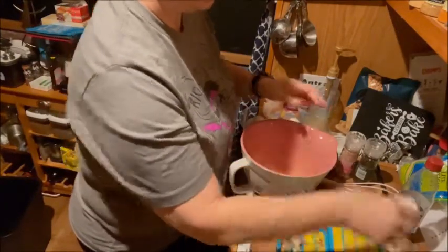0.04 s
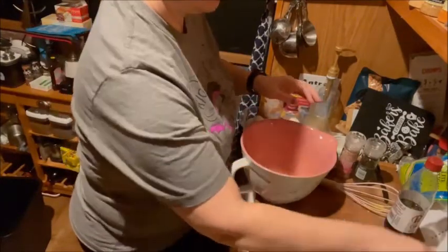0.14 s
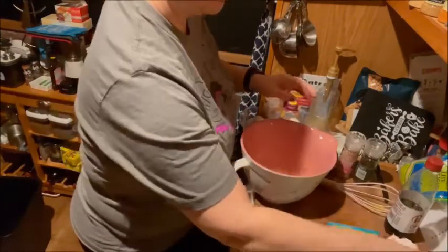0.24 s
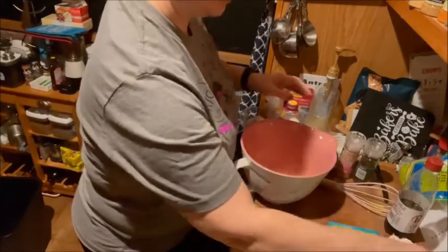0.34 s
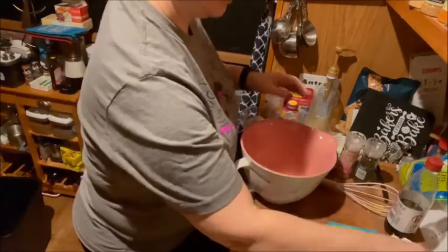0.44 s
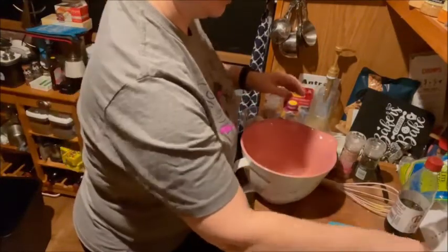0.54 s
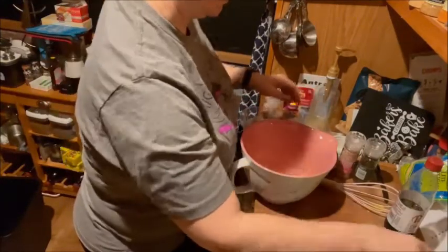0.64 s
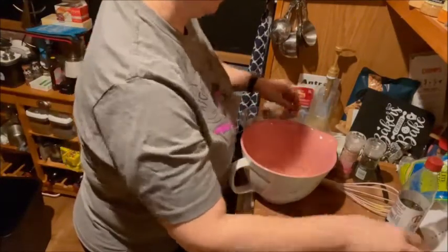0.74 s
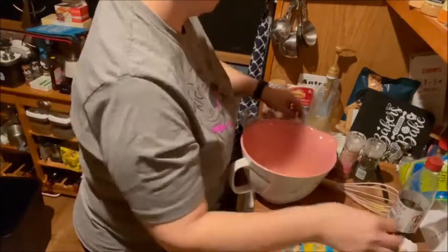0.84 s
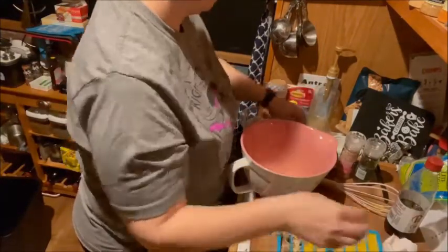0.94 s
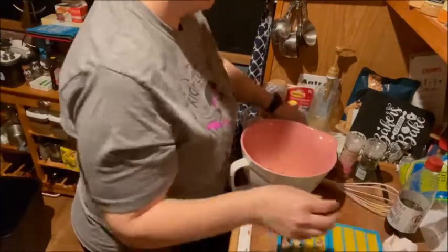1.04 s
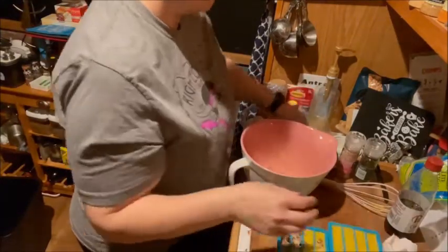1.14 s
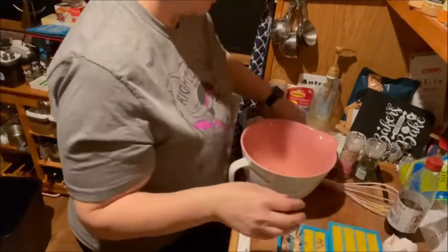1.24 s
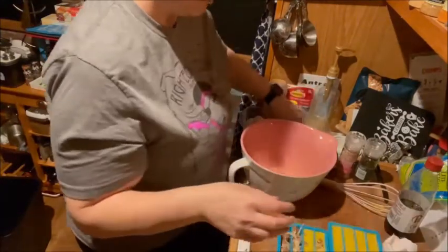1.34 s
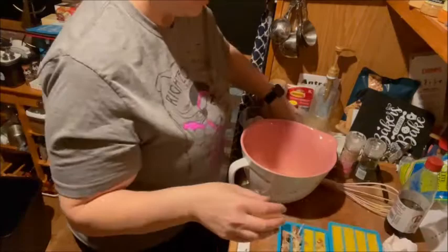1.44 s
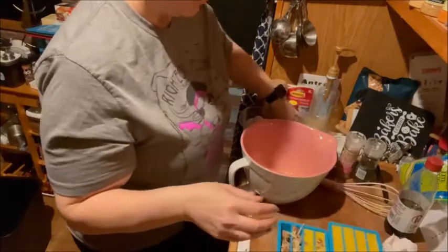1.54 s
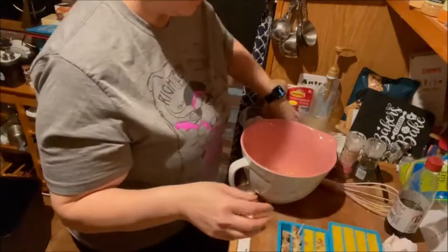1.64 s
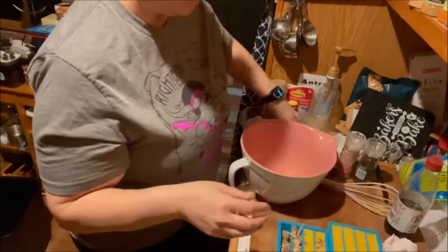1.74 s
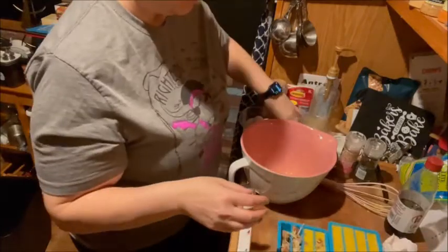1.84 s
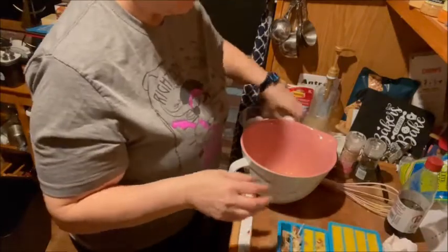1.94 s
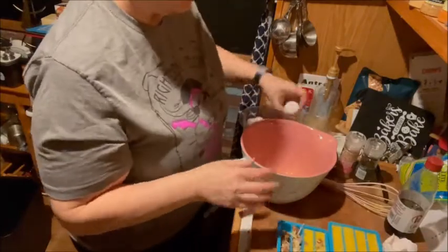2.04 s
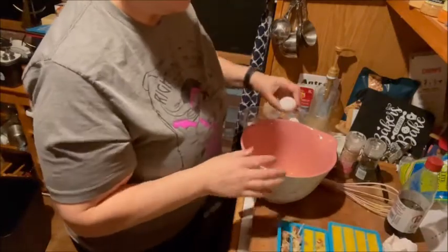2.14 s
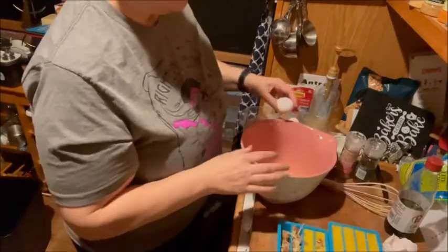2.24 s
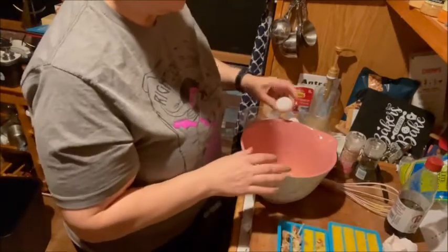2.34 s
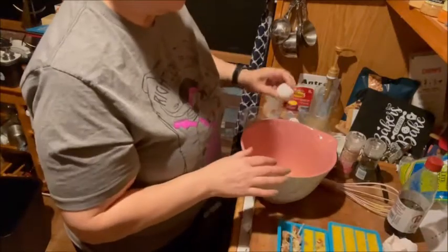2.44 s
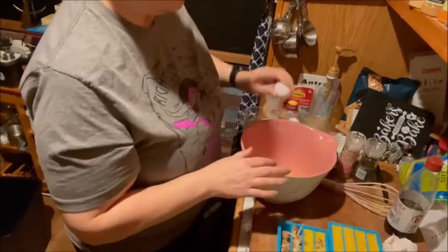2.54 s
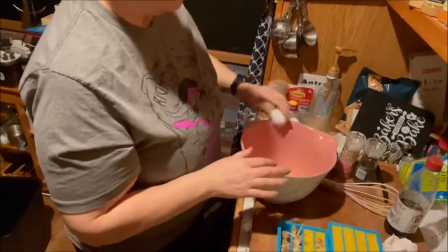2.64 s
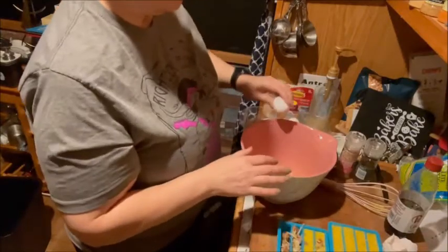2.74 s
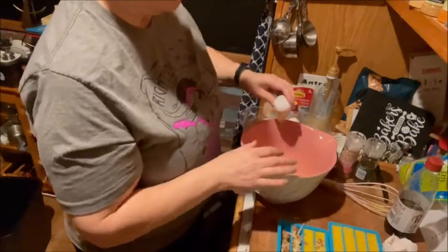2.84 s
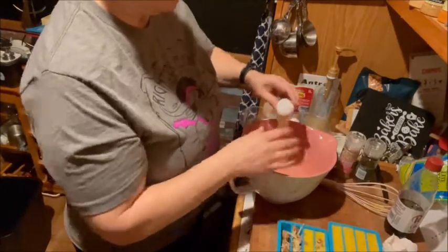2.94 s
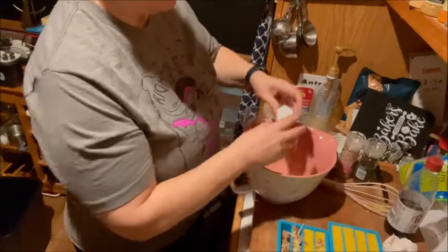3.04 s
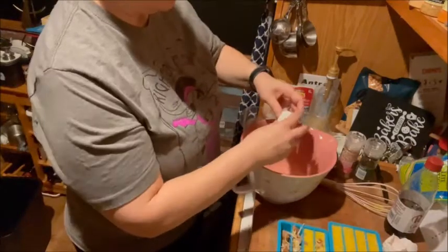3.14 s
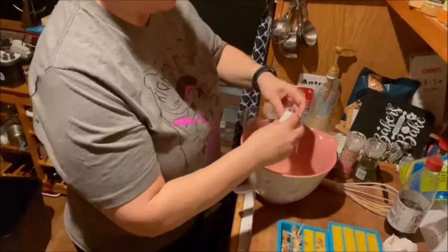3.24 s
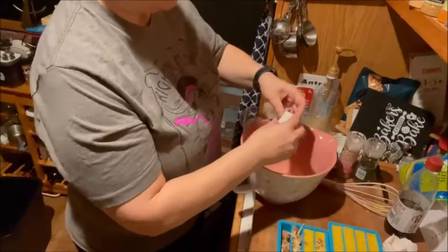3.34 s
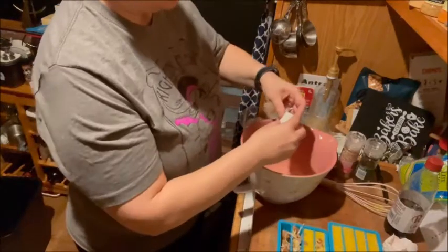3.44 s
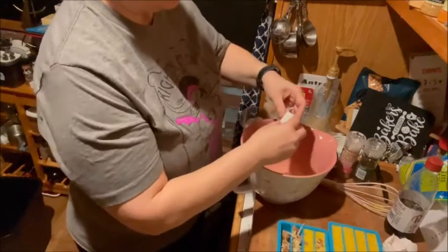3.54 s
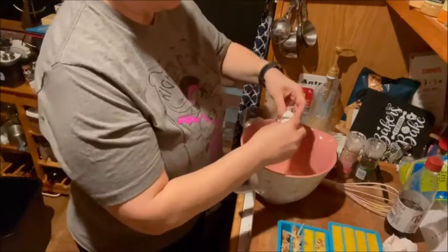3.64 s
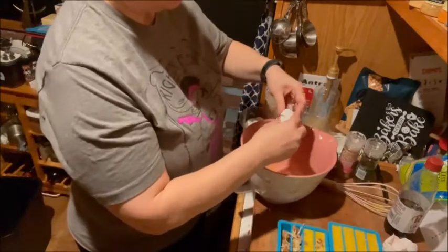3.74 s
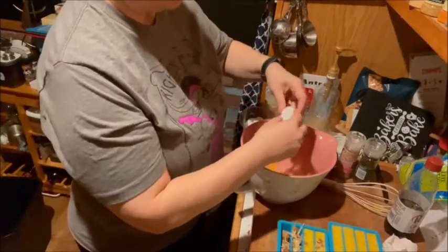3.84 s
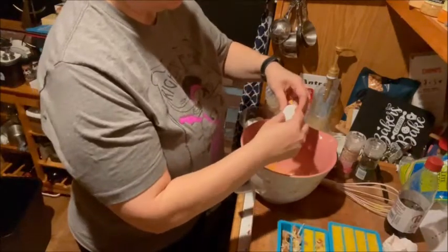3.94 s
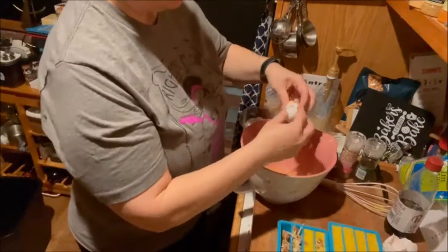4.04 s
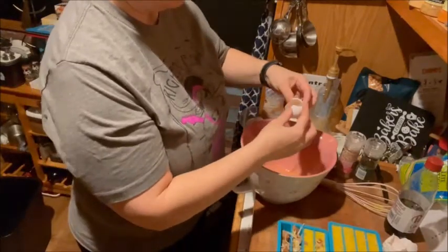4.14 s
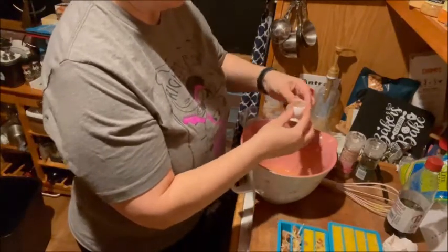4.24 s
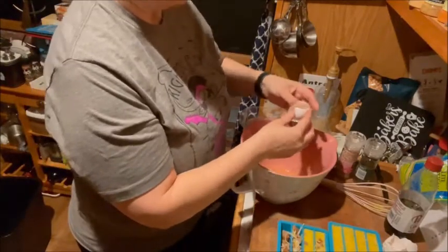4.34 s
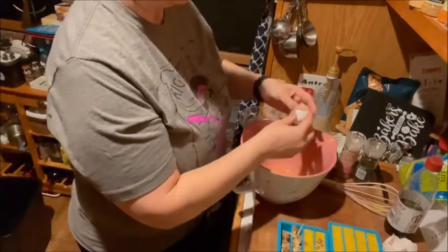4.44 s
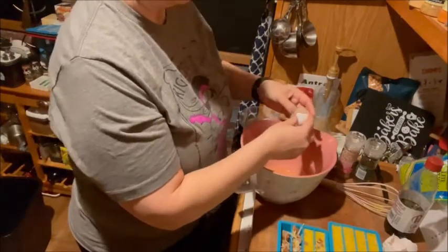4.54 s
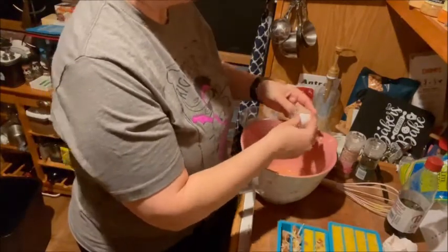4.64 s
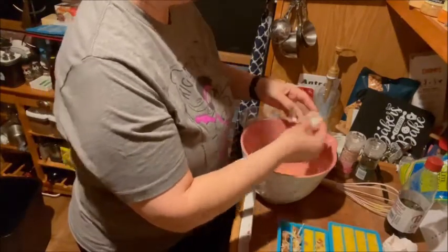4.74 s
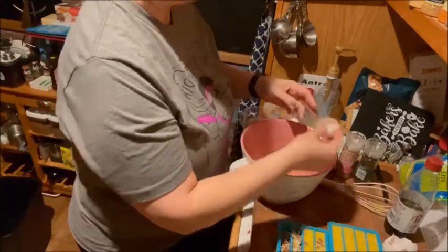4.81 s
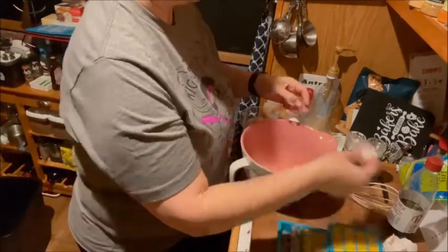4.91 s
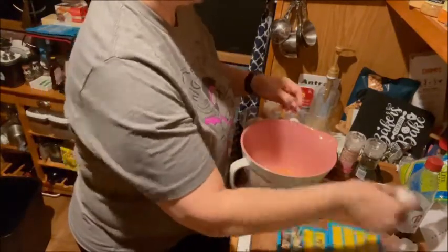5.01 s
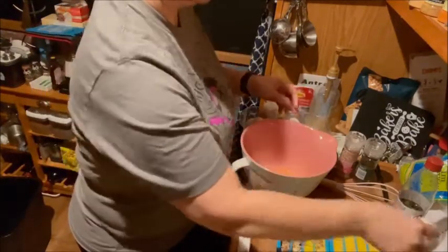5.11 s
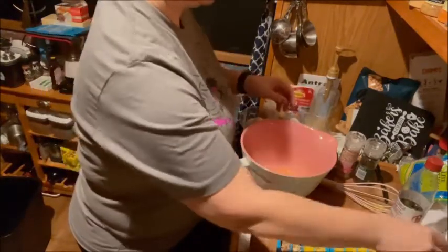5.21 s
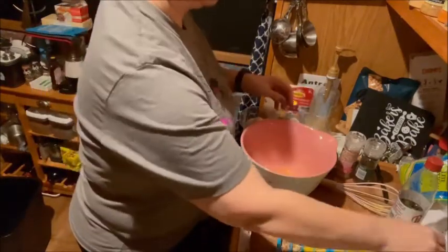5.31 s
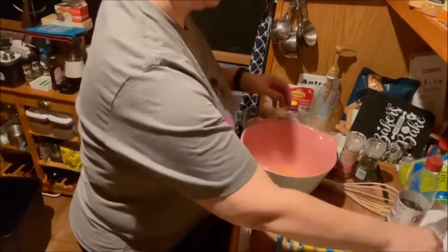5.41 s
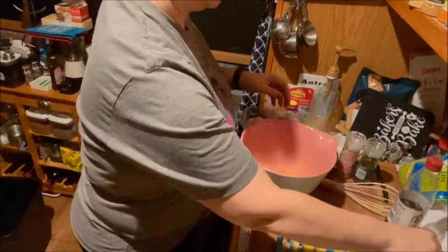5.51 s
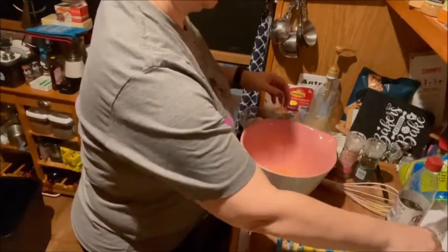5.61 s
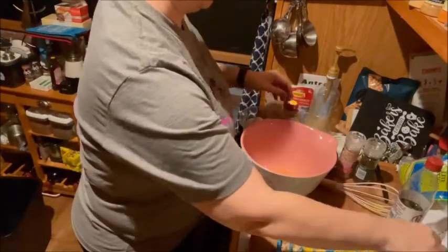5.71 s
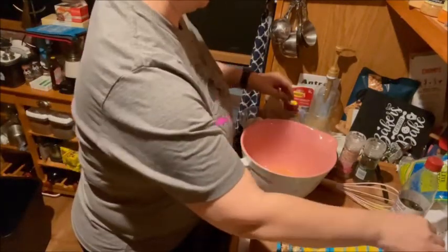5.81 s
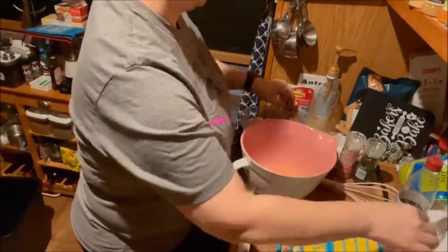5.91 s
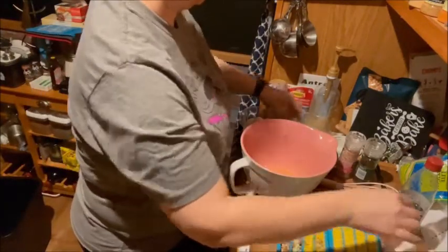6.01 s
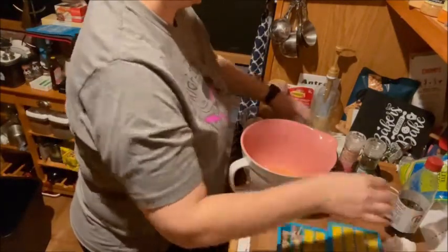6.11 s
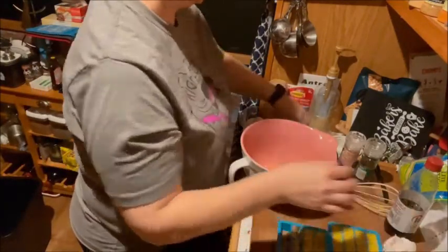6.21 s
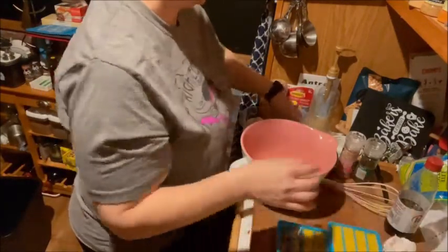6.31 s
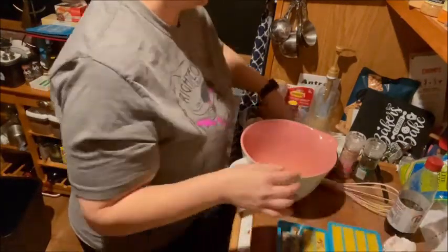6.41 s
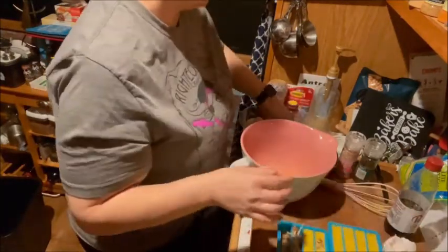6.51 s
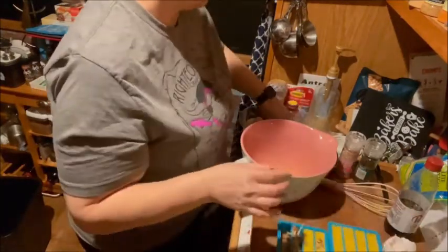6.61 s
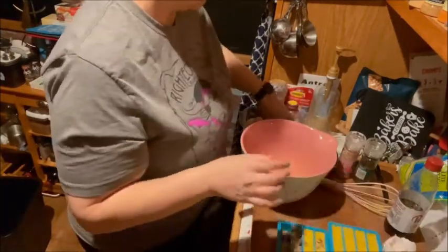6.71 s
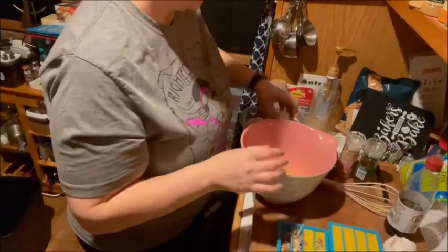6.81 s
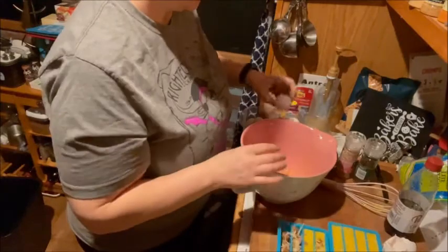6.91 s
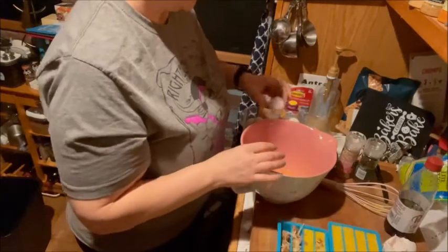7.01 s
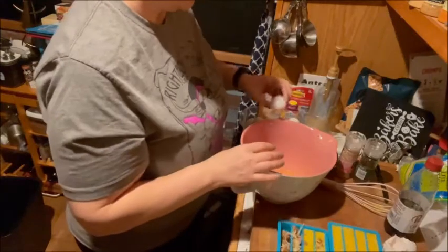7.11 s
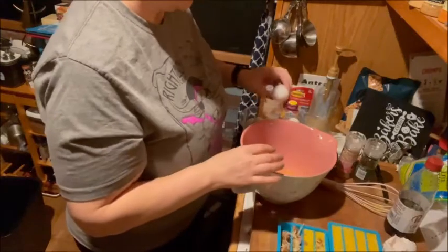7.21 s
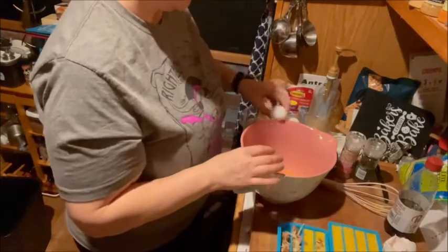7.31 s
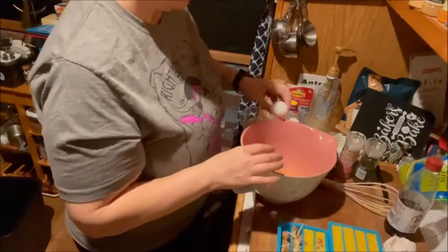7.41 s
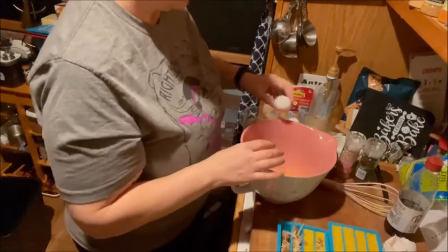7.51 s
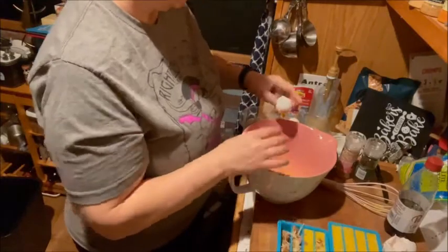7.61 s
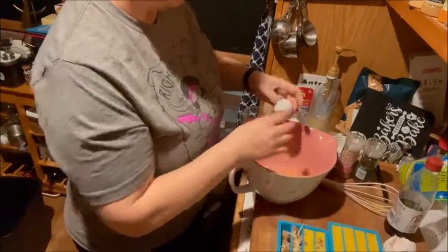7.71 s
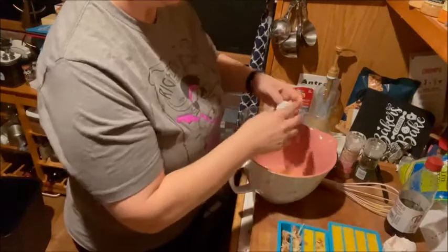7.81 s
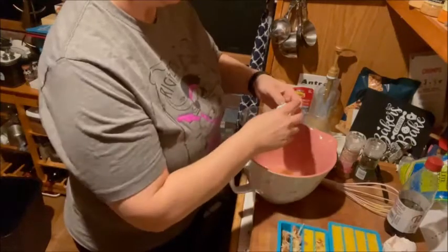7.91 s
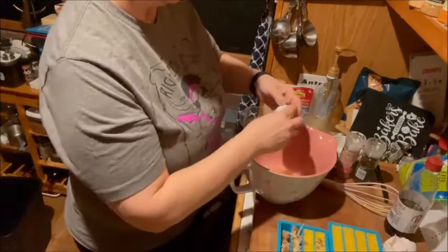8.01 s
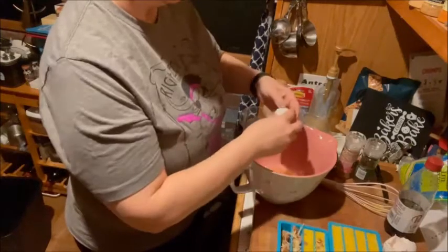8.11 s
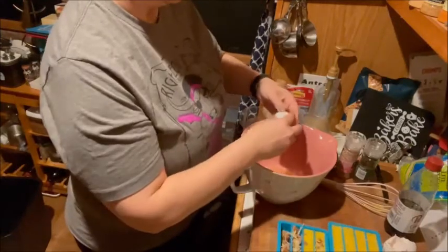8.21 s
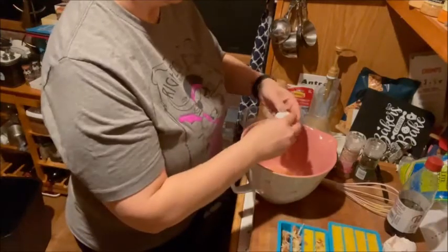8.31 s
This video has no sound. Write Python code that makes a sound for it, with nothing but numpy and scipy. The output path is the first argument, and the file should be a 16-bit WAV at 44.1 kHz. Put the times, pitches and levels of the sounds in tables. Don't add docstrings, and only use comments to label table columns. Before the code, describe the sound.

Quiet room murmur and soft hiss, low bumps of the counter under the microphone. First brittle shells rub and tick to one side, then dull cardboard scuffs lead to the loudest sound, a boxy lid snap. Next comes a hard egg tap with a clear bowl ring, crisp shell breaking and nesting, a lull, scraping shells again, light carton scuffs, another tap with a shorter, fainter ring, and fine cracks. Short room tail.

```python
import sys
import numpy as np
from scipy import signal
from scipy.io import wavfile
from scipy.ndimage import uniform_filter1d

SR = 44100
rng = np.random.default_rng(int(sys.argv[2]) if len(sys.argv) > 2 else 0)


def to_linear_factor(level_db):
    exponent = np.asarray(level_db, float) / 20
    return 10 ** exponent


def master_out(mix):
    frames = np.transpose(np.atleast_2d(mix))
    ceiling = np.clip(frames, -1, 1)
    pcm = np.round(ceiling * 32767).astype(np.int16)
    wavfile.write(sys.argv[1], SR, pcm)


N = 368676
HZ = np.fft.rfftfreq(4096, 1 / SR)


def evened(x):
    return x / np.sqrt(np.mean(x ** 2) + 1e-20)


def peaked(x, db):
    return to_linear_factor(db) * x / np.sqrt(uniform_filter1d(x ** 2, 200).max())


def read(points, hz):
    f, value = np.transpose(points)
    return np.interp(np.log(hz + 1), np.log(f + 1), value)


def peaks(table):
    return sum(db / (1 + (2 * (HZ - hz) / width) ** 2) for hz, width, db in table)


def colour(x, db):
    log_gain = np.log(to_linear_factor(np.maximum(db, -100)))
    full = np.r_[log_gain, log_gain[-2:0:-1]]
    taps = np.fft.ifft(np.exp(full - 1j * signal.hilbert(full).imag)).real
    return signal.oaconvolve(x, taps[:2048])[:len(x)]


def resonate(x, hz, width_hz):
    r = np.exp(-np.pi * width_hz / SR)
    if np.isscalar(hz):
        pole = r * np.exp(2j * np.pi * hz / SR)
        return 2 * signal.lfilter([1 - r], [1, -pole], x).real
    turn = np.exp(2j * np.pi * np.cumsum(hz) / SR)
    return 2 * (turn * signal.lfilter([1 - r], [1, -r], x / turn)).real


def crumble(length_s, per_s, spread_db, first, rise_s=0.0005, size=6000):
    chance = rng.random(size)
    big = rng.exponential(1, size)
    sign = rng.standard_normal(size)
    shower = (chance < per_s / SR) * sign * to_linear_factor(spread_db * np.minimum(big, 3))
    t = np.arange(size) / SR
    shower *= (1 - np.exp(-(t / rise_s) ** 2)) * np.exp(-t / length_s)
    shower[0] = first
    return shower


def swell(s, db, rise_s, fall_s, size=16):
    t = np.arange(0, N, size) / SR - s
    below = np.maximum(-t / max(rise_s, 1e-3), t / max(fall_s, 1e-3))
    return np.repeat(to_linear_factor(db - 20 * below), size)[:N]


def add(mix, s, sound, pan_db=0, send_db=0):
    part = mix[:, round(s * SR):][:, :len(sound)]
    gains_db = np.array([[.5 * pan_db], [-.5 * pan_db], [send_db]])
    part += to_linear_factor(gains_db) * sound[:part.shape[1]]


# (f/Hz, density/dB)
FLOOR_SPECTRUM = [(15, -46), (25, -16), (55, -4), (172, -17), (238, 1), (287, -10), (398, -15.5),
                  (455, -7.5), (494, -27.5), (536, -7), (947, -26.5), (1060, -30), (4210, -50),
                  (6500, -53.5), (16400, -57)]
# (t/s, level/dB)
STIR = [(0.0, -66.5), (1.07, -65.5), (1.23, -60.5), (1.68, -62), (1.86, -58), (2.091, -67.5),
        (2.439, -66.5), (2.72, -61.5), (3.21, -67), (4.56, -73), (6.38, -63.5), (6.89, -68.5), (7.362, -66),
        (8.36, -67)]
# (f/Hz, correlation)
SAME = [(60, -0.67), (180, 0.76), (550, -0.32), (1650, -0.59), (4970, 0.37), (15000, 0.51)]


def murmur():
    level_db = -62
    frames, hz = N // 256 + 5, np.fft.rfftfreq(1024, 1 / SR)
    a, b, c, d, patches = rng.standard_normal((frames, 513, 5)).T
    patches = evened(uniform_filter1d(uniform_filter1d(patches, 6, 0), 12, 1))
    s, db = np.transpose(STIR)
    stir_db = np.interp(np.arange(frames) * 256 / SR, s, db - db.mean())
    same = np.clip(read(SAME, hz), -1, 1)[:, None]
    left = a + 1j * b
    right = same * left + np.sqrt(1 - same ** 2) * (c + 1j * d)
    z = np.array([left, right]) * to_linear_factor(read(FLOOR_SPECTRUM, hz)[:, None] + 1.6 * patches)
    z /= np.sqrt(np.mean(abs(z) ** 2))
    low = 1 / (1 + (hz[:, None] / 1300) ** 2)
    steady = signal.istft(z, nperseg=1024, noverlap=768)[1].std()
    stirred = signal.istft(z * to_linear_factor(low * stir_db), nperseg=1024, noverlap=768)[1]
    return to_linear_factor(level_db) / steady * stirred[:, :N]


# (peak t/s, level/dB, rise/s, fall/s)
JOLTS = [(.02, -63, 0.059, 0.63), (.63, -53, 0.23, 0.23), (.98, -62.5, .3, .2), (1.35, -53.5, 0.11, 0.12),
         (1.51, -47, 0.22, 0.018), (1.948, -55, 0.13, 0.15), (2.44, -54.5, 0.14, 0.035),
         (2.649, -38, 0.09, 0.13), (2.9, -64.5, 0.12, .7), (3.61, -68.5, .3, 0.077),
         (4.891, -77, 0.16, 0.45), (5.92, -51.5, 0.047, 0.27), (6.09, -52.5, 0.19, 0.034),
         (6.45, -61, 0.36, 0.84), (7.289, -38, 0.04, .08), (7.54, -45, 0.051, 0.22),
         (8.08, -53, 0.25, 0.032)]


def shudder():
    counter_hz, rest_db = 85, -88
    level = to_linear_factor(rest_db) + sum(swell(*jolt) for jolt in JOLTS)
    a, b = (evened(resonate(resonate(z, counter_hz, 80), 0.69 * counter_hz, 51))
            for z in rng.standard_normal((2, N)))
    return level * to_linear_factor(-1.5) * np.array([a + .65 * b, a - .65 * b])


# (t/s, peak level/dB, f/Hz, width/Hz)
SHORT_RINGS = [(.856, -52, 3780, 200), (.856, -60, 2750, 300), (2.84, -69, 2130, 120),
               (3.066, -61.5, 5720, 204.3), (3.5, -54, 880, 300), (3.513, -55, 1000, 200),
               (3.538, -54, 1200, 160), (3.553, -53, 1150, 160), (3.578, -60, 1200, 160),
               (3.4985, -47, 3600, 500), (3.48, -58, 3100, 300), (3.484, -60, 1800, 400), (4.1, -66, 2050, 60),
               (4.165, -57, 3100, 200), (4.26, -63, 3000, 200), (4.39, -65, 2500, 600), (1.147, -66, 1500, 300),
               (1.2, -68, 1850, 90), (1.215, -58, 600, 200), (1.52, -80, 3600, 90), (.139, -82, 1320, 300),
               (.152, -80, 1700, 400), (1.897, -22, 520, 260), (1.924, -25, 465, 50), (1.926, -38, 2130, 120),
               (1.898, -40, 2450, 200), (2.565, -38, 432, 50), (2.566, -38, 760, 120), (1.35, -36, 430, 90),
               (5.361, -37, 1720, 130), (.4605, -42, 1430, 200), (.64, -60, 2350, 150), (.305, -50, 2160, 150),
               (7.262, -44, 800, 200), (2.563, -34, 1512, 28), (2.563, -38, 1890, 100), (7.258, -42, 1512, 60),
               (7.256, -44, 1200, 250), (1.812, -44, 1950, 130), (1.812, -44, 1300, 130),
               (3.877, -61.5, 2825, 200), (4.288, -53, 1104, 896), (1.478, -38, 150, 120),
               (2.561, -32, 1171, 200), (7.257, -42, 177, 90)]


def short_rings(mix):
    for s, db, hz, width_hz in SHORT_RINGS:
        breaks = crumble(0.002, 4000, 5.5, 1.45)
        note = resonate(resonate(breaks, hz, width_hz), hz, 2 * width_hz)
        add(mix, s, peaked(note, db + 5.5), pan_db=-1.0, send_db=-11.0)


# (f/Hz, density/dB)
SHELL = [(500, -53.5), (1500, -29), (2500, -4), (3200, -4), (4800, -4.5), (8000, -6.5), (11000, -9),
         (16000, -27)]
# (f/Hz, width/Hz, level/dB)
HALVES = [(1430, 70, 6), (1700, 60, 5), (1880, 60, 5), (2070, 50, 7), (2350, 60, 7), (2630, 60, 6),
          (2950, 50, 5), (3300, 80, 4)]
# (t/s, f/Hz)
GAPE = [(.3, 1900), (.35, 1560), (.41, 1750), (.46, 1450), (.52, 1390), (.63, 1440), (1.2, 1850),
        (4.1, 2000), (5.36, 1740), (5.6, 1850), (5.76, 1780), (5.83, 1550), (5.9, 1800), (5.97, 2200),
        (6.02, 1930), (6.08, 1800), (6.2, 1850)]
CUP_HZ = 1370, 1245, 1900
# (t/s, peak level/dB, shard ring f/Hz, hollow cup level/dB, fizz above 8 kHz level/dB)
PILE = [(0.2973, -46.5, 6300, -5, -3.5), (.308, -52, 2900, 4, -12), (.35, -56, 3160, 6, -12),
        (.3665, -55, 3160, 6, -12), (0.3984, -54, 6000, 4, -10), (.478, -53, 2900, 5, -12),
        (.4586, -44, 5400, 5.5, -6.5), (.505, -46.5, 5930, -1.5, -4), (.631, -62, 5400, 11.5, -11.5),
        (.8554, -59, 3700, -32, -27.5), (5.357, -52.5, 6150, 10, -10.5), (5.3648, -54, 4000, 17, -12),
        (5.4426, -58, 2900, 12, -15), (5.597, -62, 2630, 6, -10), (5.8257, -62, 3000, 8, -12),
        (5.4086, -44.5, 5900, 3, -12), (5.5616, -56.5, 6990, 5, 12), (5.6185, -55, 6130, -2, 7.5),
        (5.7648, -55, 2790, 0, -9), (5.812, -60, 6000, 0, -10), (5.8544, -67, 6050, -8, -19.5),
        (6.0004, -52, 6030, 1, -11), (6.0234, -52.5, 5830, 13.5, -17), (6.0801, -62, 3300, 17, -11.5),
        (6.1114, -58.5, 2830, 13, -34.5)]
PICKING = [
    (1.0141, -49, 6800, -3.5, -21.5),
    (1.0994, -60, 3650, -2, -16.5),
    (1.2111, -60.5, 5200, -2, -19),
    (1.263, -64.5, 4960, 0.5, -16),
    (1.3299, -48, 2750, -13, -19.5),
    (1.92, -38, 2100, 8, -19),
    (2.84, -67, 5760, 2.5, -12),
    (7.4964, -59.5, 6670, -15, -12),
    (7.5443, -65.5, 6080, -14, 2.5),
    (7.6156, -63.5, 3360, 2.5, -34.5),
]
OPENING = [(3.0654, -47, 5860, -17, -3), (3.1093, -54.5, 3830, -13.5, -14.5),
           (3.3393, -56, 6360, -26, -8.5), (3.3682, -57, 6280, -22, -19.5), (3.4261, -66.5, 3270, -15, -11),
           (3.4715, -47, 3190, -10.5, -10), (3.4979, -32, 5700, -17.5, -8), (3.6651, -53.5, 6140, -21, 3.5),
           (3.7459, -65, 5620, -4.5, -12), (3.8761, -56.5, 2880, -31, -16),
           (3.8944, -58.5, 3140, -21.5, -15), (8.1648, -66, 4160, -22.5, -18.5),
           (8.1983, -48.5, 7770, -41.5, -9), (8.2307, -57, 5960, -29, -8.5), (8.3255, -63, 7840, -31, -4.5),
           (8.3544, -55.5, 5770, -26.5, -9.5)]
NESTING = [
    (3.9935, -49, 4830, -2.5, -16.5),
    (4.0966, -59, 5720, -3, -15),
    (4.1512, -51, 3880, -9, 6.5),
    (4.1597, -42.5, 3060, -15, -8.5),
    (4.232, -52, 3070, -5, -11.5),
    (4.2848, -51, 5960, -7.5, -10),
    (4.3194, -53, 2990, -20, -24),
    (4.4809, -60, 2970, -5, -15),
]


def snaps(mix):
    for events, cup_hz, pan_db in zip((PILE, PICKING, OPENING, NESTING), (0, *CUP_HZ), (8.5, -3.0, -1.0, 1.0)):
        for s, db, hz, cup_db, fizz_db in events:
            ring_db = (4 - .5 * fizz_db) / (1 + ((HZ - hz) / (0.15 * hz)) ** 2)
            tilt_db = (fizz_db + 20) * np.clip(np.log2(HZ / 6000 + 1e-3) / 1.1, 0, 1)
            shower = crumble(0.00098, 6000, 4.8, 5.7)
            shard = colour(shower, read(SHELL, HZ) + ring_db + tilt_db)
            note = cup_hz or np.interp(s, *np.transpose(GAPE))
            cup = resonate(resonate(shower, note, 600), note, 900)
            cup = colour(resonate(cup, 1.08 * note, 1700), peaks(HALVES))
            sound = peaked(shard, db) + peaked(cup, db + cup_db + 2.5)
            add(mix, s, to_linear_factor(-3.0) * sound, pan_db)


# (f/Hz, density/dB)
FIZZ = [(2000, -35.5), (3200, -16), (5000, 10), (8500, 3.5), (10200, 12), (16000, -17.5)]
# (peak t/s, level/dB, rise/s, fall/s, fizz level/dB)
STROKES = [(0.299, -40, 0.0076, 0.12, -40), (.47, -66.5, .01, 0.332, -31),
           (0.633, -57.5, 0.0065, 0.019, -31), (1.27, -69.5, 0.52, 0.042, -10),
           (2.573, -43, .01, 0.089, -8), (7.27, -49.5, 0.0099, 0.08, -5), (3.503, -58.5, 0.117, 0.093, -1),
           (4.17, -52.5, 0.068, 0.23, -16.5), (4.29, -62.5, 0.019, 0.18, -19), (4.55, -75, 0.095, 0.28, -3),
           (5.365, -37, 0.013, 0.06, -13), (5.53, -61, 0.08, 0.5, 5), (5.61, -43, 0.12, .16, -9),
           (5.845, -57.5, 0.23, 0.041, -32), (5.97, -60, .09, .03, -35), (.39, -50, .06, .08, -25),
           (6.17, -53, .05, .06, -15), (6.02, -46, 0.05, 0.1, -20), (6.09, -43, 0.1, 0.08, -20)]


def rubs(mix):
    wander = evened(uniform_filter1d(rng.standard_normal(N), 2500))
    hz = np.interp(np.arange(N) / SR, *np.transpose(GAPE)) * (1 + 0.02 * wander)
    clumps_db = 4.0 * evened(uniform_filter1d(rng.standard_normal(N), 350))
    slips = (rng.random(N) < 2600 / SR) * rng.standard_normal(N)
    slips *= to_linear_factor(clumps_db + 2.8 * np.minimum(rng.exponential(1, N), 3))
    cup = resonate(resonate(resonate(slips, hz, 1070), hz, 920), 1.1 * hz, 1800)
    cup = cup + resonate(resonate(slips, 2300, 600), 2300, 900)
    cup = evened(colour(cup + .8 * resonate(slips, hz, 110), peaks(HALVES)))
    fizz = evened(colour(slips, read(FIZZ, HZ)))
    strokes = sum(swell(s, db - 10.5, rise_s, fall_s) * (cup + to_linear_factor(fizz_db) * fizz)
                  for s, db, rise_s, fall_s, fizz_db in STROKES)
    add(mix, 0, strokes, 2.5)


# (multiple of box pitch, width/Hz, level/dB)
CARTON = [(0.999, 120, 6.5), (1.42, 120, 4), (2.48, 90, -11.5), (3.0, 90, -14), (4.08, 110, -23),
          (4.55, 100, -20), (5.2, 130, -28)]
# (f/Hz, density/dB)
CARTON_AIR = [(70, -40), (220, -17.5), (480, -3), (800, -15), (1100, -15.5), (2200, -19), (5000, -32.5),
              (9000, -42.5), (16000, -68)]
# (t/s, peak level/dB, box pitch f/Hz, brightness/dB, L-R/dB)
KNOCKS = [
    (1.026, -35, 433, -73, -7),
    (1.477, -50, 258, -40, -5),
    (4.292, -49, 783, 2, -3),
]
LID = [
    (1.8975, -15, 475, -18, -3),
    (1.9245, -13, 469, -25, -3),
]
SCUFFS = [(0.914, -59, 530, -20, 8), (1.289, -34.5, 437, -38, -3), (1.884, -42, 492.4, -13, -1),
          (1.333, -24, 620, -15, 2), (1.35, -28, 487, -42, -19), (1.399, -38, 398.4, -17, -4.5),
          (1.628, -32, 507, -22.5, -5), (1.647, -27.5, 440, -24.5, 0), (1.794, -27, 520, -21, -7.5),
          (1.808, -32, 713, -19.5, 1.5), (1.954, -35, 504, -16.5, 2.5), (6.42, -41, 300, -30, 0),
          (6.458, -45, 400, -30, 0), (1.936, -28, 470, -25, -3), (1.908, -32, 470, -25, -3),
          (1.672, -34, 620, -22, 0), (6.477, -37, 650, -29.5, -12.5), (6.489, -35.5, 250, -35, 0.5),
          (6.549, -52.5, 614, -25, 26)]


def carton():
    mix = np.zeros((3, N))
    for events, length_s, rise_s in ((KNOCKS, .002, .006), (LID, .0007, .002), (SCUFFS, .012, .012)):
        for s, db, hz, bright_db, pan_db in events:
            push = crumble(length_s, 8000, 3.0, .02, rise_s)
            tilt_db = (bright_db + 18.0) * np.clip(np.log2(HZ / 800 + 1e-3) / 2.9, 0, 1)
            air = evened(colour(push, read(CARTON_AIR, HZ) + tilt_db))
            box = sum(to_linear_factor(d) * resonate(resonate(push, k * hz, width_hz), k * hz, 4 * width_hz)
                      for k, width_hz, d in CARTON)
            add(mix, s - 0.37 * rise_s, peaked(air + 0.89 * evened(box), db - 5.0), pan_db)
    return mix


TAP_S = 2.558, 7.2535
# (peak level/dB, length/s, L-R/dB)
TAPS = [
    (-18.5, 0.006, -4),
    (-21, 0.004, -1),
]
# (f/Hz, density/dB)
CRACK = [(90, -36.5), (150, -19), (300, -18), (570, -11), (860, -16), (1170, -7.5), (1500, -9),
         (1950, -18.5), (2550, -12.5), (3350, -21), (4350, -22), (6390, -14.5), (9000, -18), (16000, -36)]


def cracks(mix):
    for s, (db, length_s, pan_db) in zip(TAP_S, TAPS):
        shower = crumble(length_s, 9000, 4.0, 0.64, rise_s=0.0017)
        add(mix, s, peaked(colour(shower, read(CRACK, HZ)), db - 6.5), pan_db)


BOWL_HZ = [561.5, 580.4, 1516.5, 1501.3, 2522.6, 2759.6, 3764.6, 3757, 4395, 4343, 3064, 5076, 6120, 6527,
           7370]
# (t60/s, first egg level/dB, second egg level/dB)
BOWL_RING = [(.58, -28, -33.5), (.58, -31, -37.5), (1.18, -42, -47.5), (1.18, -44.5, -49.5),
             (.65, -28, -39.5),
             (0.25, -34, -50), (0.3, -39, -60), (0.3, -44, -65), (0.25, -35, -58), (0.3, -41, -55),
             (0.4, -50, -57), (0.28, -40, -52), (0.27, -43, -50), (.32, -44, -51), (0.25, -47, -55)]
BEAT_START = [(.75, 1.0, -1.2, -2.9), (.1, 3.05, 0, 0)]
# (L-R/dB, right port lead/rad)
BOWL_AIM = [(-4.5, .5), (9, 1.6), (-5.5, 1.0), (-3.5, 1.0), (-1.5, 1.1), (0, 1.4)]


def bowl():
    build_cycles = 5.0
    t = np.arange(SR + SR // 2) / SR
    mix, side = np.zeros((2, N)), np.c_[[.5, -.5]]
    for k, s in enumerate(TAP_S):
        start, phase = round(s * SR), np.zeros(len(BOWL_HZ))
        phase[[1, 3, 7, 9]] = BEAT_START[k]
        for m, (hz, (t60_s, *db)) in enumerate(zip(BOWL_HZ, BOWL_RING)):
            pan_db, lead = BOWL_AIM[min(m, len(BOWL_AIM) - 1)]
            ring = to_linear_factor(side * pan_db) * np.sin(2 * np.pi * hz * t + phase[m] - side * lead)
            level = to_linear_factor(db[k] - 60 * t / t60_s) * (1 - np.exp(-(t * hz / build_cycles) ** 2))
            mix[:, start:start + len(t)] += (level * ring)[:, :N - start]
    return mix


# (t/s, level/dB)
SQUEAK = [
    (7.599, -89),
    (7.614, -75),
    (7.706, -69),
    (7.725, -86),
    (8.05, -95.5),
]
# (f/Hz, width/Hz, level/dB)
SQUEAK_RING = [(1847, 80, 3.5), (3370, 240, -13.5)]


def squeak(mix):
    s, db = np.transpose(SQUEAK)
    t = np.arange(s[0], s[-1], 1 / SR)
    slips = (rng.random(len(t)) < 600 / SR) * rng.standard_normal(len(t))
    ring = sum(to_linear_factor(d) * evened(resonate(resonate(slips, hz, width_hz), hz, 2 * width_hz))
               for hz, width_hz, d in SQUEAK_RING)
    add(mix, s[0], to_linear_factor(np.interp(t, s, db) - 5.5) * ring)


# (f/Hz, t60/s)
ROOM = [(100, 0.59), (400, 0.27), (1500, 0.37), (4000, 0.32), (8000, 0.24), (14000, 0.24)]


def kitchen(x):
    taps = np.zeros((2, SR // 2))
    at = np.arange(60, SR // 2 - 12, 12) + rng.integers(0, 12, (2, (SR // 2 - 61) // 12))
    np.put_along_axis(taps, at, rng.choice([-1., 1.], at.shape), 1)
    hz, t, z = signal.stft(taps, SR, nperseg=128)
    early_db = 7.4 * np.exp(-t / 0.016)
    decay_db = -60 * t / read(ROOM, hz)[:, None]
    tail = signal.istft(z * to_linear_factor(decay_db + early_db), SR, nperseg=128)[1]
    low = signal.lfilter(*signal.butter(1, 600, fs=SR), tail[0] - tail[1])
    tail = tail - np.array([[.33], [-.33]]) * low
    return signal.fftconvolve(x[None], tail / np.linalg.norm(tail[0]), axes=1)[:, :N]


def scene():
    mix, box = np.zeros((3, N)), carton()
    for source in (short_rings, snaps, rubs, cracks, squeak):
        source(mix)
    near = to_linear_factor(-3.5) * mix[:2] + to_linear_factor(-6.5) * box[:2]
    direct = np.array([near[0], np.roll(near[1], shift=2)])
    room = to_linear_factor(4.0) * kitchen(mix[2] + to_linear_factor(-5.5) * box[2])
    return direct + room + bowl() + shudder() + murmur()


def low_pass(x):
    return signal.sosfilt(signal.butter(12, 16000, fs=SR, output="sos"), x)


# (f/Hz, width/Hz, level/dB)
MICROPHONE = [(6340, 1200, 5), (12900, 280, -27.5), (15000, 2300, 3.0), (16310, 230, -38)]


def record(dry):
    mix = np.array([colour(x, peaks(MICROPHONE)) for x in dry])
    return low_pass(mix)


dry = scene()
out = record(dry)
master_out(out)
```